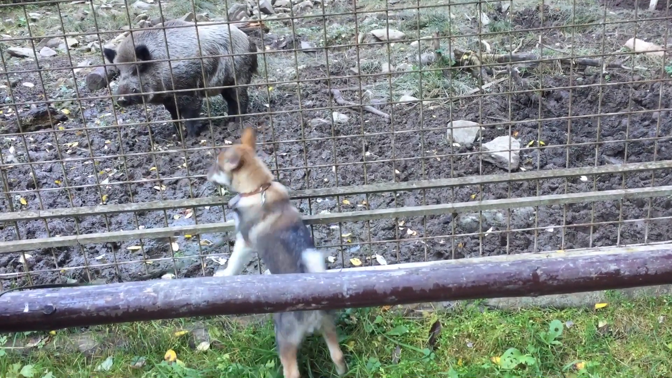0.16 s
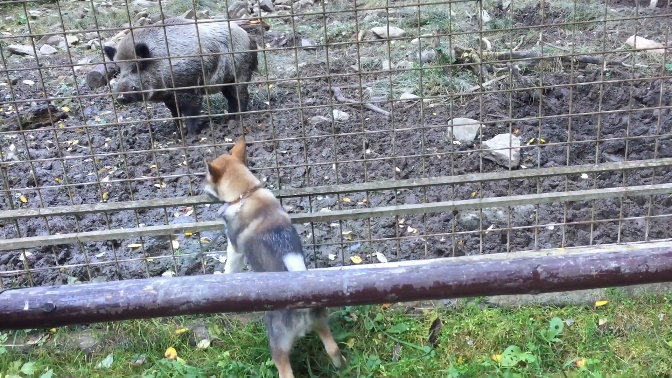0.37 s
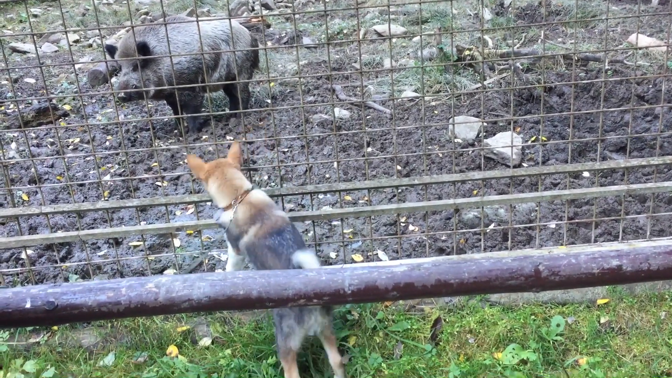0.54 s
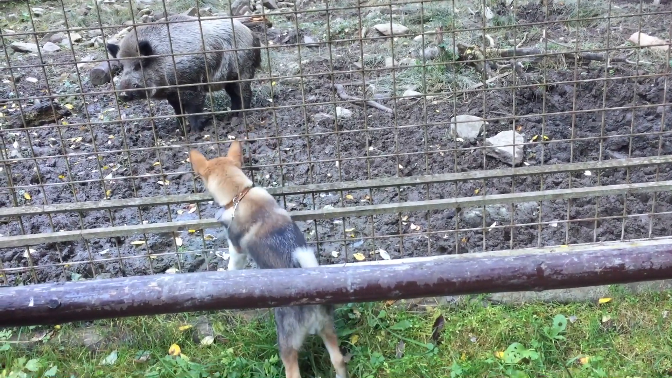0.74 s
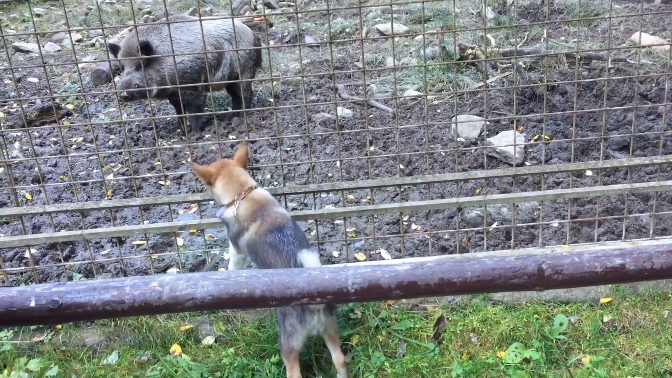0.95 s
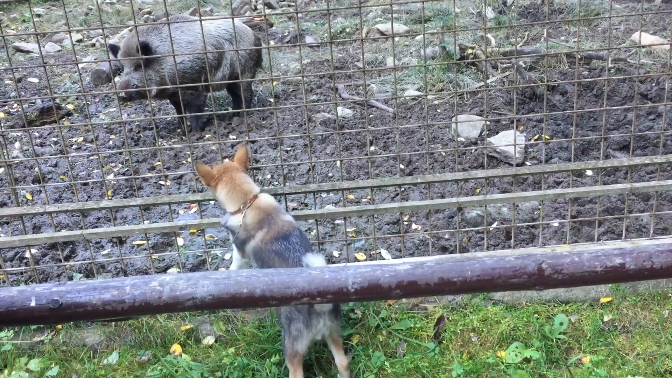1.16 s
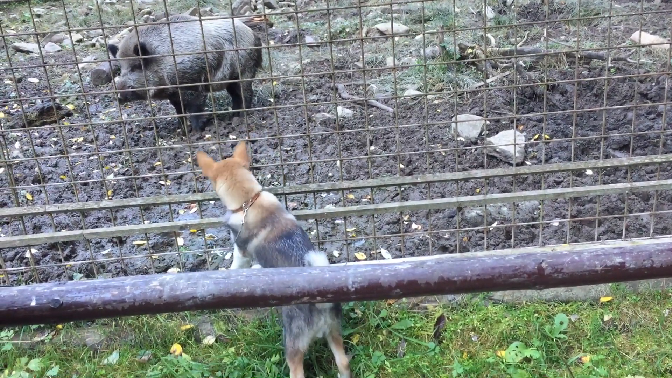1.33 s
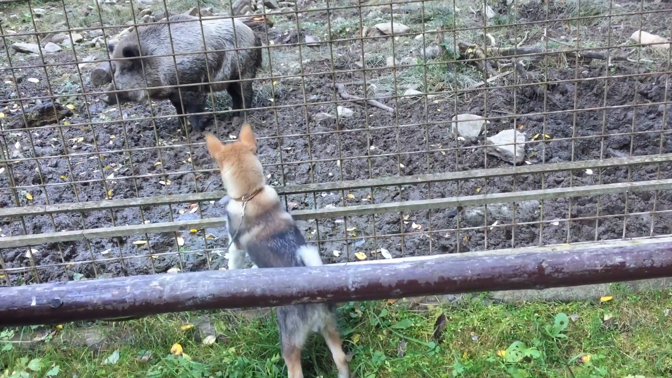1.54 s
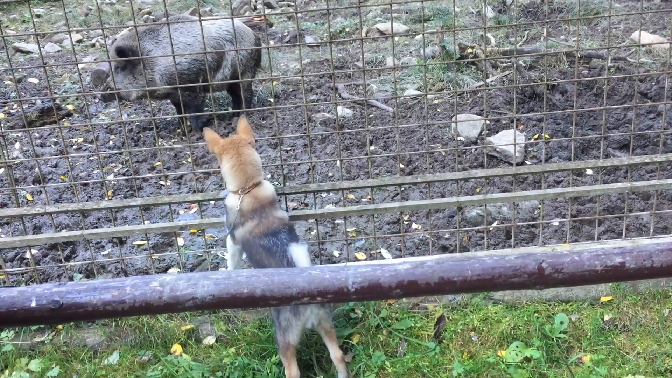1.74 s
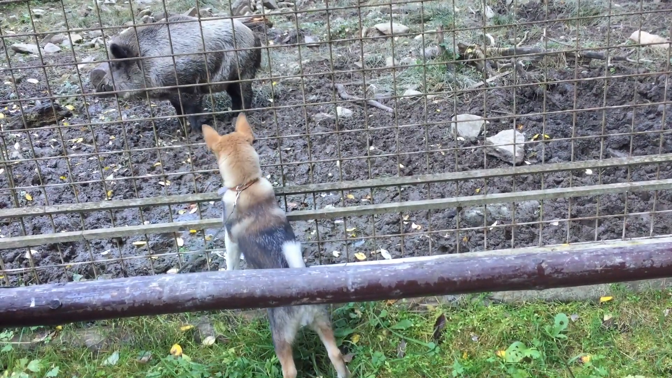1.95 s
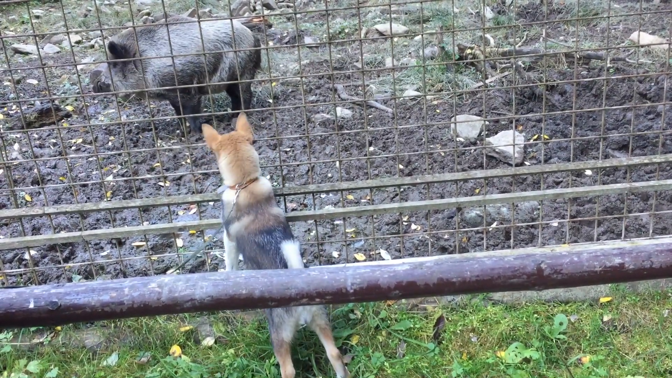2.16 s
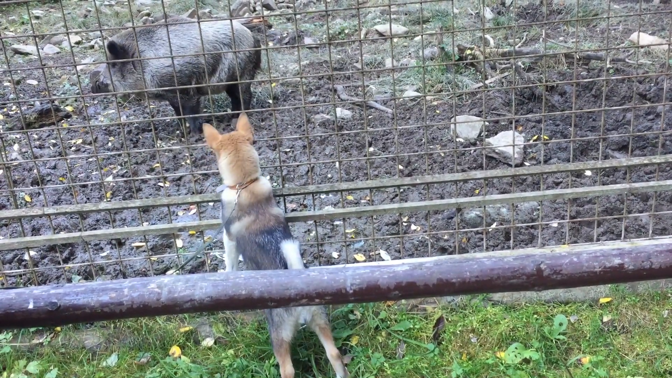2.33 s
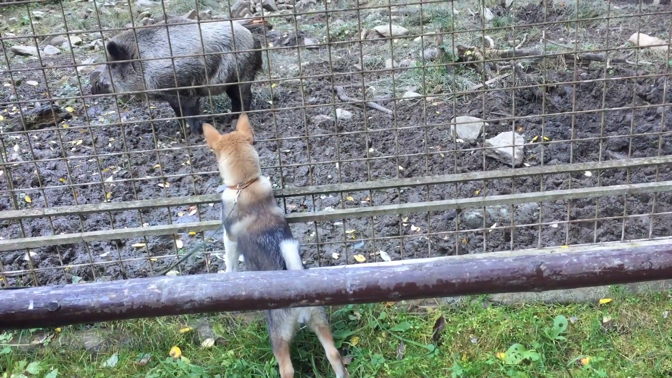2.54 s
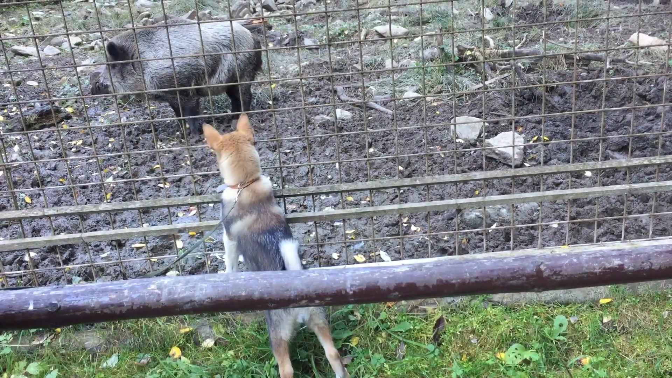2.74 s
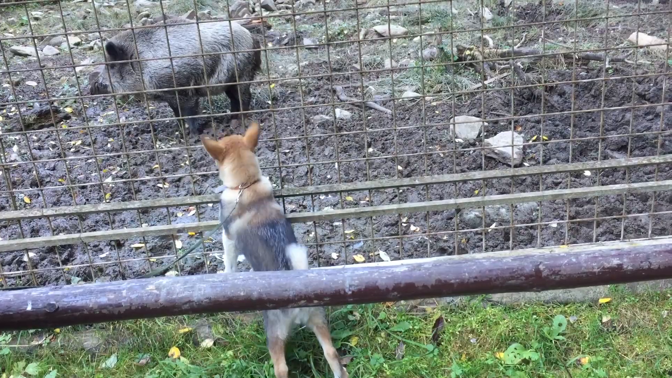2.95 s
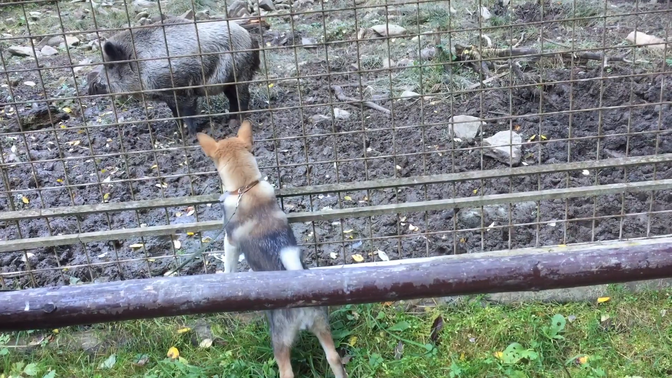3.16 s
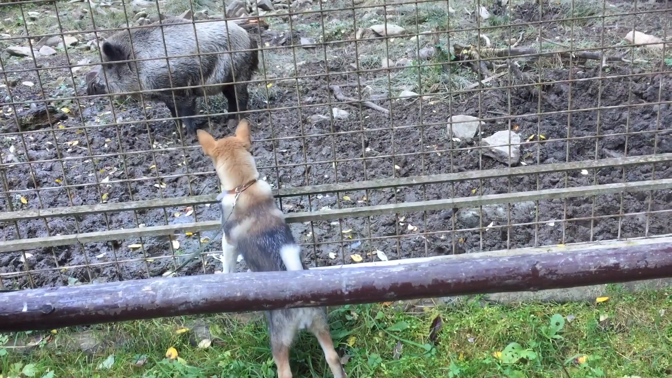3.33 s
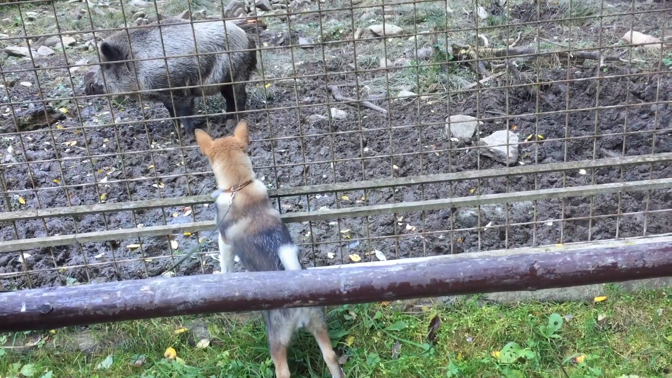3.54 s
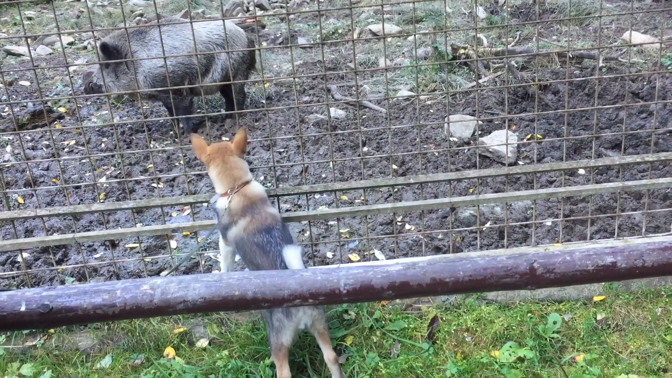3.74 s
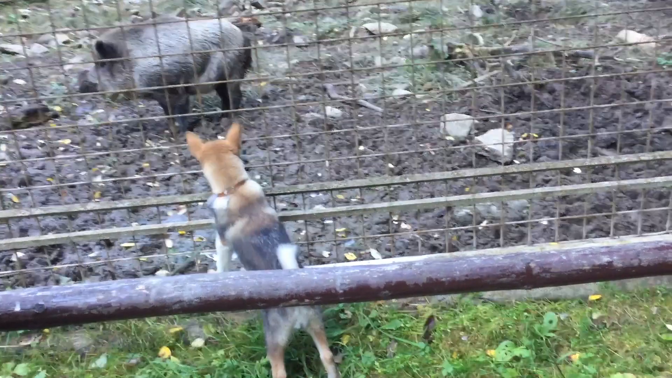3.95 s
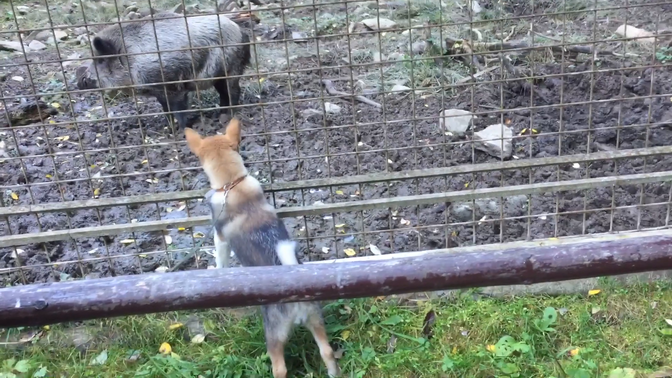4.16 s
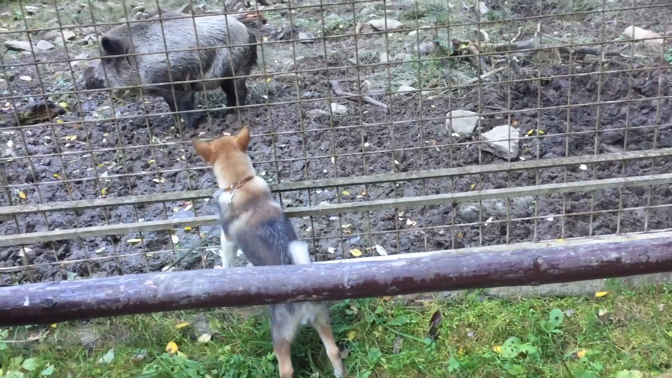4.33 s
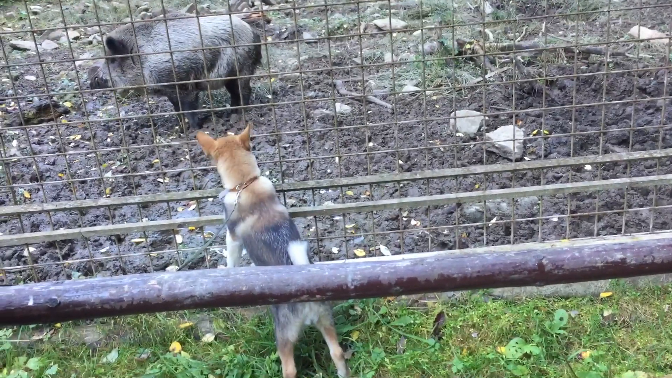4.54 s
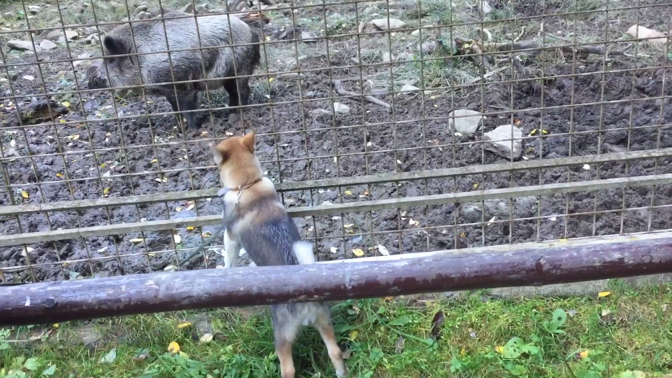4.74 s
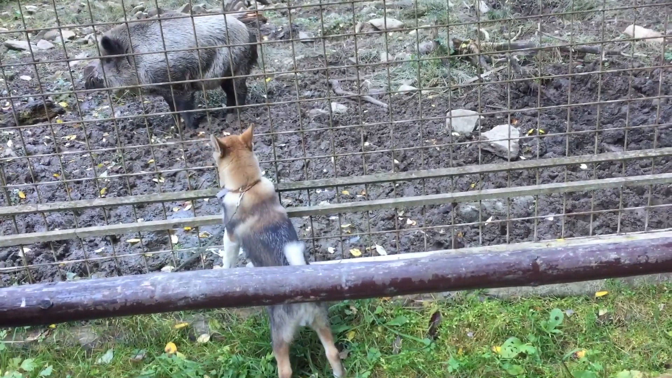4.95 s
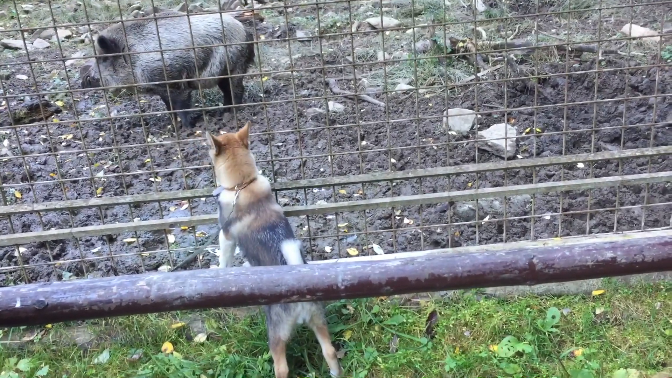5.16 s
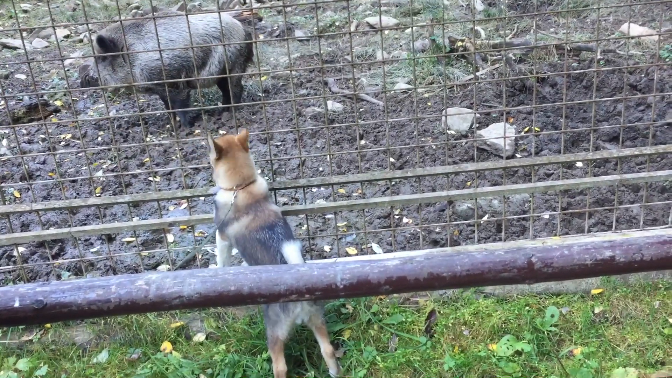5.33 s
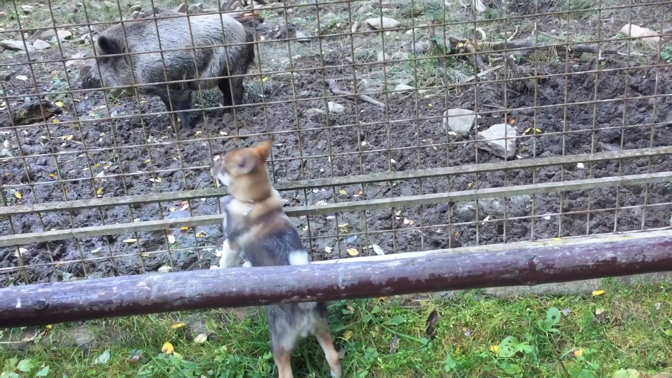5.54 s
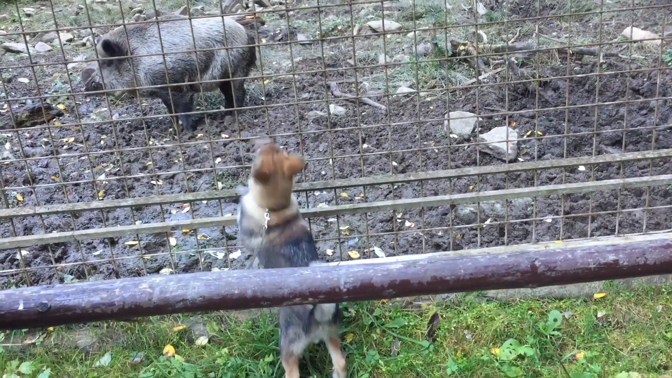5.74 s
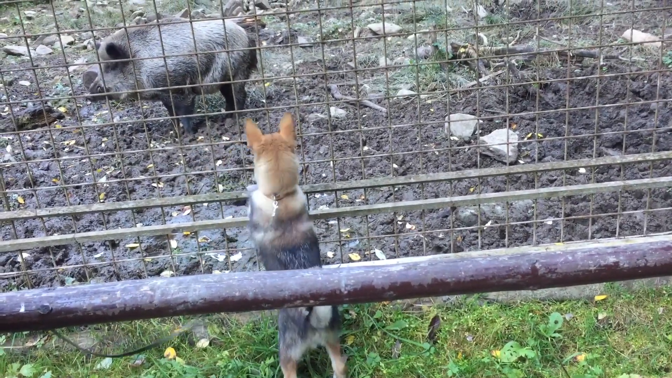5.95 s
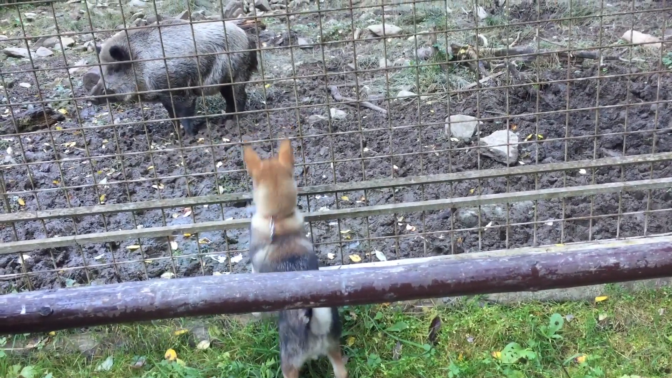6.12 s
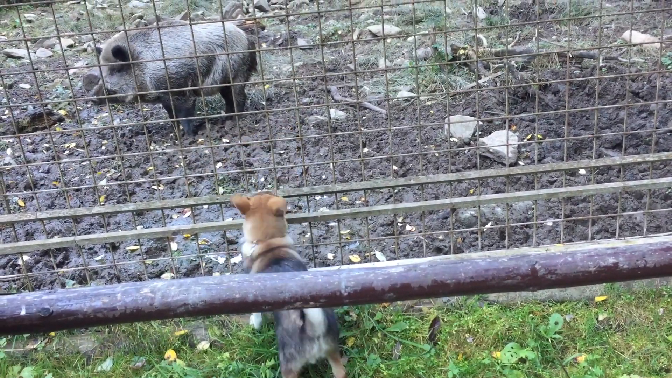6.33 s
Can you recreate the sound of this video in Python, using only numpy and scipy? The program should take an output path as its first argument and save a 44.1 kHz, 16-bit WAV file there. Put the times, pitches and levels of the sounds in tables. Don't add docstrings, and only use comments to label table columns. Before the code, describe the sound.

A young dog barks in short, piercing yaps that start as clear tones and crack into rough rasp. Two come fast, a third leads to thin, rising whines, then a pause with one small click. Five more yaps follow with whimpers and faint nasal whistles, then a pulsing yelp and a final bark. Dry, close sound in an open yard, with faint scattered echoes and very quiet air and wind.

```python
import sys
import numpy as np
from scipy import signal
from scipy.fft import rfft, irfft
from scipy.io import wavfile
from scipy.ndimage import uniform_filter1d, minimum_filter1d

SR = 44100
rng = np.random.default_rng(int(sys.argv[2]) if len(sys.argv) > 2 else 0)


def nominal_scale(level):
    x = np.asarray(level, float) / 20
    return 10 ** x


def file_out(sig):
    cols = np.atleast_2d(sig).T
    lim = np.clip(cols, -1, 1)
    pcm = np.round(lim * 32767).astype(np.int16)
    wavfile.write(sys.argv[1], SR, pcm)


N = 286191

# (start [s], length [s], peak [dB], beat rate from [Hz], beat rate to [Hz])
YAPS = [
    (0.068, 0.15, -8.5, 937.6, 689),
    (0.336, 0.17, -12, 902.6, 667),
    (.934, 0.17, -14, 867.4, 618),
    (2.982, 0.14, -8.5, 919.5, 783.6),
    (3.682, 0.12, -12, 813.4, 744),
    (4.265, 0.15, -8.5, 882.7, 600.8),
    (4.713, 0.14, -8, 845, 642.7),
    (5.421, 0.16, -9.5, 893, 848),
    (5.818, 0.058, -20.5, 956, 1046),
    (6.251, 0.14, -8, 964.4, 698),
]
# (time [s], pitch [Hz], level [dB])
LOCKED_BEATS = [
    (3.648, 278.8, -11.5),
    (3.664, 278.1, -12),
    (3.697, 280, -8.5),
]
# (frequency [Hz], density [dB per Hz])
BREATH_HISS = [(3000, -29), (3700, -11), (5500, -5.5), (6000, -1.5), (7100, 3.5), (8400, -1),
               (12600, -10.5), (15800, -11)]


def evened(x):
    return x / np.sqrt(np.mean(x ** 2) + 1e-20)


def read(points, hz):
    f, value = np.transpose(points)
    return np.interp(np.log(hz + 1), np.log(f + 1), value)


def spread(rows):
    s, *columns = np.transpose(rows)
    t = np.arange(s[0], s[-1], 1 / SR)
    return s[0], [np.interp(t, s, c) for c in columns]


def add(mix, s, sound, fade_s=0.0013):
    part = mix[round(s * SR):][:len(sound)]
    faded = sound * signal.windows.tukey(len(sound), min(1, 2 * fade_s * SR / len(sound)))
    part += faded[:len(part)]


def drift(count, hz):
    noise = rng.standard_normal(count + 2000)
    return evened(signal.lfilter(*signal.butter(2, 2 * hz / SR), noise)[2000:])


def coloured(x, points):
    gain = nominal_scale(read(points, np.fft.rfftfreq(len(x), 1 / SR)))
    return irfft(rfft(x) * gain, len(x))


def resonate(x, hz, width):
    turn = np.exp(2j * np.pi * np.cumsum(hz * np.ones(len(x))) / SR)
    r = np.exp(-np.pi * width / SR)
    return 2 * (turn * signal.lfilter([(1 - r) ** 2], [1, -2 * r, r * r], x / turn)).real


def steadied(x, span_s):
    power = uniform_filter1d(x ** 2, int(span_s * SR), mode="reflect")
    return x / np.sqrt(abs(power) + 0.081 * np.mean(x ** 2))


def glide(length, from_hz, to_hz, power=1):
    u = np.arange(0, length, 1 / SR) / length
    return u, from_hz + (to_hz - from_hz) * u ** power


def arch(u):
    return abs(np.sin(np.pi * u ** 0.79)) ** 1.01


def yard():
    # (frequency [Hz], density [dB per Hz])
    hum_colour = [(65, -55.5), (110, -18), (261, -7), (378, -6.5), (427, -14.5), (860, -4), (1500, -9),
                  (15000, -30.5)]
    level_db = -62 + 0.47 * drift(N, 8)
    return nominal_scale(level_db) * evened(coloured(rng.standard_normal(N), hum_colour))


def wind():
    # (time [s], peak [dB], length [s])
    puffs = [(0.0, -53, 0.09), (0.502, -56, 0.075), (0.684, -42, .048), (2.717, -45.5, 0.096),
             (2.811, -35.5, 0.067), (2.9, -57, 0.22), (3.455, -56, 0.093), (3.8, -58, 0.19),
             (4.107, -45, 0.086), (5.627, -44, 0.067), (5.7, -66.5, 0.39), (6.1, -53, 0.17),
             (6.285, -46, 0.21)]
    rumble_colour = [(15, -26), (45, 10.5), (80, 5.5), (130, -13.5), (300, -57)]  # (Hz, dB)
    rumble = evened(coloured(rng.standard_normal(N), rumble_colour))
    level = nominal_scale(-75 + 2.0 * drift(N, 5.9))
    for s, db, length in puffs:
        add(level, s, nominal_scale(db - 8.5) * np.hanning(int(length * SR)))
    return level * steadied(rumble, 0.31)


def echoes(x):
    # (frequency [Hz], 60 dB decay time [s])
    decay = [(300, 0.5), (800, 1.2), (2000, 2), (3200, 2.5), (6000, .25), (12000, .15)]
    noise = rng.standard_normal(int(1.5 * SR))
    hz, t, z = signal.stft(noise, SR, nperseg=256)
    near = nominal_scale(-47 - 60 * t / .085)
    shed = 1 + 1.1 * np.exp(-((t - .27) / .05) ** 2)
    far = nominal_scale(-66.0 - 60 * t / read(decay, hz)[:, None]) * shed * np.clip(t / 0.011, 0, 1)
    tail = signal.istft(z * (near + far), SR, nperseg=256)[1]
    return signal.fftconvolve(x, tail)[:N]


def ticks():
    # (time [s], peak [dB])
    clicks = [
        (0.5152, -32),
        (0.5437, -47),
        (0.5834, -48),
        (2.134, -38),
    ]
    out, t = np.zeros(N), np.arange(260) / SR
    for s, db in clicks:
        snap = np.diff(rng.standard_normal(261)) * np.exp(-t / .0013)
        add(out, s, nominal_scale(db + 4.0) * snap / abs(snap).max(), fade_s=.0002)
    return out


def gasp():
    # (frequency [Hz], density [dB])
    rasp_colour = [(100, -8), (350, 1), (2300, -3), (3800, -13), (4650, -11.5), (5500, -23), (9000, -26.5),
                   (14000, -36)]
    peak_s, rise_s, fall_s, edge_db = 3.97, 0.1, 0.18, -10
    s, (db,) = spread([(peak_s - rise_s, edge_db), (peak_s, 0), (peak_s + fall_s, edge_db)])
    rasp = evened(coloured(rng.standard_normal(len(db)), rasp_colour))
    return s, nominal_scale(-42 + db + 0.5 * drift(len(db), 20.5)) * rasp


def whistle(s, length, from_hz, to_hz, db):
    u, hz = glide(length, from_hz, to_hz)
    phase = 2 * np.pi * np.cumsum(hz * (1 + 0.0087 * drift(len(hz), 120))) / SR
    return s, np.sqrt(2) * nominal_scale(db) * arch(u) * (np.cos(phase) + nominal_scale(-20) * np.cos(2 * phase))


def moan(s, length, from_hz, to_hz, db):
    u, hz = glide(length, from_hz, to_hz)
    air = rng.standard_normal(len(hz))
    blurred = evened(resonate(air, hz, 28))
    nose = evened(resonate(air, 777, 300))
    octave = evened(resonate(air, 2 * hz, 60))
    return s, nominal_scale(db) * arch(u) * (blurred + nominal_scale(-1.5) * nose + nominal_scale(-26) * octave)


def grunt(s, db, hz, length):
    count = int(length * SR)
    return s, nominal_scale(db) * np.hanning(count) * evened(resonate(rng.standard_normal(count), hz, 110))


def tone(s, hz, size, mouth_db):
    # (frequency [Hz], level [dB])
    tract = [(1350, 0.9), (1550, 5.5), (1800, 0.9), (2130, 9), (2350, 2), (2750, -8), (3100, -11.5),
             (3400, -27)]
    # (frequency [Hz], level [dB])
    cliff = [(2400, -14), (3150, -18.5), (3500, -39), (4300, -62)]
    # (frequency [Hz], level [dB])
    upper = [(3300, -35), (5200, -40.5), (7000, -49.5), (15000, -61.5)]
    sizes = [size] + [size * nominal_scale(mouth_db + read(tract, k * hz)) for k in (2, 3)]
    effort = uniform_filter1d(np.hypot(size, sizes[1]), size=900)
    phase = 2 * np.pi * np.cumsum(hz * (1 + 0.004 * drift(len(hz), 66))) / SR
    for k in range(4, 15):
        pressed = effort ** 1.8 * nominal_scale(read(upper, k * hz) + 5.5 * drift(len(hz), 40))
        sizes.append(sizes[2] * nominal_scale(read(cliff, k * hz)) + pressed)
    sizes = [uniform_filter1d(a, size=90) * (1 + 0.021 * drift(len(hz), 250)) for a in sizes]
    air = rng.standard_normal(len(hz))
    hiss = nominal_scale(-19) * evened(coloured(air, BREATH_HISS)) / 10
    breath = sizes[0] * nominal_scale(-29.5) * evened(resonate(air, 1900, 1000) + hiss)
    partials = sum(np.sqrt(2) * a * np.cos((k + 1) * phase + k * k) for k, a in enumerate(sizes))
    return s, breath + partials


def whine(rows):
    s, (hz, size, mouth_db) = spread([(t, f, nominal_scale(db), mouth) for t, f, db, mouth in rows])
    return tone(s, uniform_filter1d(hz, size=500, mode="nearest"), size, mouth_db)


def hoot(s, length, from_hz, to_hz, db):
    u, hz = glide(length, from_hz, to_hz)
    return tone(s, hz, nominal_scale(db + 3.0 * drift(len(u), 120)) * arch(1 - u), -23.5)


def start(s, from_hz, to_hz, db, mouth_db):
    breaks = np.r_[np.array(YAPS)[:, 0], LOCKED_BEATS[0][0]]
    handover_s = .006
    u, hz = glide(breaks[breaks > s].min() - s + handover_s, from_hz, to_hz, power=.7)
    catch = 0.11
    swell = u ** (0.76 - 0.011 * db)
    opening_db = -5.5 * (1 - u)
    return tone(s, hz, nominal_scale(db) * (catch + (1 - catch) * swell), mouth_db + opening_db)


def locked():
    # (multiple of pitch [1], level [dB])
    orders = [(1, -48), (2, -14.5), (3, 0.5), (4, -4.5), (5, -10.5), (6, 3), (7, -11.5), (8, -6.5),
              (9, -12.5), (10, -12.5), (11, -19.5), (12, -20), (13, -70)]
    s, (hz, db) = spread(LOCKED_BEATS)
    phase = 2 * np.pi * np.cumsum(hz * (1 + 0.018 * drift(len(hz), 71))) / SR
    lines = sum(nominal_scale(o + 2.1 * drift(len(hz), 90)) * np.cos(k * phase + k * k) for k, o in orders)
    air = evened(coloured(rng.standard_normal(len(hz)), BREATH_HISS))
    return s, nominal_scale(db) * (evened(lines) + nominal_scale(-35.5) * air)


def yap(s, length, db, from_hz, to_hz, second_hz, mouth, uneven, open_db, air_db, rise_s, extra, sagged):
    # (level [dB], short at the break [dB], held share [1], fade [dB], share of mouth level [1])
    layers = [(0.17, -10, 0.31, -37, 0.1345), (1.7, -6.5, 0.35, -33.5, 1.45), (-3.5, -2, 0.49, -31.5, 2),
              (0.4, -16.5, 0.39, -22, 0.07)]
    # (frequency [Hz], width [Hz], level [dB])
    mouth_modes = [(2110, 160, 3.5), (2325, 150, 0.5), (2636, 130, 1.5), (3123, 33, -14.5)]
    # (frequency [Hz], width [Hz], level [dB])
    clumps = [(4350, 1200, -1.3), (6340, 1200, 0), (7920, 5400, 0.5), (9840, 4200, -2), (13200, 6200, -2.5)]
    u = glide(length, 0, 0)[0]
    hz = from_hz + (to_hz - from_hz) * np.minimum(u / sagged, 1)
    levels = []
    for own, short, held, fade, share in layers:
        hold = held + extra
        faded = np.clip((u - hold) / (1 - hold), 0, 1) ** 1.21
        levels.append(db + own + share * open_db + short * np.exp(-u * length / rise_s) + fade * faded)
    low_db, second_db, mouth_db, hiss_db = levels

    turns = np.cumsum(hz * (1 + .05 * drift(len(hz), 160))) / SR
    beat = np.diff(np.floor(turns), prepend=0)
    strength = np.clip(rng.standard_normal(300), -1.8, 1.8)[turns.astype(int)]
    low = steadied(resonate(beat * (1 + uneven * strength), hz, 310), 0.013)
    ragged = evened(beat * (.9 + strength)) + .35 * rng.standard_normal(len(hz))
    jaw = (1 + 0.027 * drift(len(hz), 23)) * (hz / hz.mean()) ** 0.29

    def ring(modes):
        return evened(sum(nominal_scale(g) * steadied(resonate(ragged, f * jaw, w), .012) for f, w, g in modes))

    second = ring([(.9 * second_hz, 200, -3.0), (1.033 * second_hz, 170, 0.)])
    upper_mouth = ring([(f * mouth, w, g) for f, w, g in mouth_modes])
    puff = (1.2 + abs(strength) * np.exp(-(turns % 1) / 0.32)) * rng.standard_normal(len(hz))
    air = coloured(puff, BREATH_HISS)
    hiss = sum(nominal_scale(g + 2.6 * drift(len(hz), 30)) * resonate(air, f * jaw, w) for f, w, g in clumps)
    voice = nominal_scale(low_db) * low + nominal_scale(second_db) * second + nominal_scale(mouth_db) * upper_mouth
    voice = signal.lfilter(*signal.butter(4, 2 * 500 / SR, "high"), voice)
    return s, voice + nominal_scale(air_db + hiss_db) * (1 - u ** 4) * evened(hiss)


def small_calls(pup):
    # (start [s], length [s], from [Hz], to [Hz], peak [dB])
    moans = [
        (3.25, .24, 480, 450, -45),
        (3.46, .17, 475, 505, -52),
        (4.15, .11, 440, 415, -49),
        (4.125, .09, 800, 870, -48),
        (4.45, .14, 430, 360, -50),
    ]
    # (start [s], length [s], from [Hz], to [Hz], peak [dB])
    whistles = [(1.43, .15, 5040, 5130, -71), (1.45, .15, 3300, 3500, -66), (1.56, .085, 4850, 4600, -55),
                (1.632, .03, 4600, 4050, -60), (1.605, .035, 5600, 5500, -64),
                (3.34, .055, 4400, 4750, -58), (3.585, .045, 4620, 4620, -55),
                (3.795, .04, 5300, 4350, -64), (4.14, .07, 1260, 1220, -56), (4.408, .028, 5300, 4650, -56),
                (4.43, .095, 4760, 4800, -52), (4.5, .18, 4720, 4650, -67), (4.52, .14, 5520, 5480, -70),
                (4.5, .15, 3830, 3800, -70), (5.665, .04, 5350, 5450, -62)]
    # (time [s], peak [dB], pitch [Hz], length [s])
    grunts = [
        (0.162, -40.5, 415, 0.062),
        (1.048, -47, 423, 0.048),
        (3.126, -60, 262.8, 0.028),
        (4.362, -36, 477, 0.033),
        (5.833, -50.5, 383, 0.053),
        (6.334, -47, 304, 0.084),
    ]
    for voice, table in [(moan, moans), (whistle, whistles), (grunt, grunts)]:
        for row in table:
            add(pup, *voice(*row), fade_s=.003)
    add(pup, *gasp(), fade_s=0.06)


def whining(pup):
    # (time [s], pitch [Hz], level [dB], mouth [dB])
    murmur = [(.487, 471, -53, 2), (0.511, 461.4, -43, -6.5), (0.591, 428.3, -39.5, -12.5),
              (0.642, 448, -39, -3.5), (.72, 491, -51.5, -8.5)]
    # (time [s], pitch [Hz], level [dB], mouth [dB])
    sob = [(1.13, 547, -51, 1.5), (1.201, 590, -59.5, 3.5), (1.231, 676, -29, -12),
           (1.246, 727, -21.5, -10.5), (1.26, 766, -23.5, -17), (1.321, 771, -38.5, -13),
           (1.343, 701, -33.5, -8), (1.366, 745, -26, -30), (1.391, 818, -53, -20)]
    # (time [s], pitch [Hz], level [dB], mouth [dB])
    plea = [(1.388, 806, -47, -17), (1.402, 803, -34.5, -16), (1.45, 858, -34.5, -23.5),
            (1.49, 833, -30.5, -29.5), (1.562, 876, -29.5, -37.5), (1.62, 886, -32, -21),
            (1.653, 869, -59, -23)]
    # (time [s], pitch [Hz], level [dB], mouth [dB])
    whimper = [(4.375, 728, -28.5, -16), (4.4, 741, -22.5, -29.5), (4.454, 730, -33, -29.5),
               (4.467, 840, -42.5, -20.5), (4.54, 848, -39.5, -31.5), (4.622, 817, -33, -36),
               (4.66, 779, -27.5, -29), (4.674, 837, -27.5, -23.5), (4.686, 1070, -24.5, -14.5)]
    # (time [s], pitch [Hz], level [dB], mouth [dB])
    lead_in = [(5.6, 768, -48, -8), (5.65, 775, -40, -17), (5.675, 764, -33.5, -22),
               (5.689, 793, -20.5, -20), (5.701, 792, -33.5, 6)]
    # (time [s], pitch [Hz], level [dB], mouth [dB])
    yelp = [(5.696, 755, -35, -6), (5.706, 883, -11.5, -12.5), (5.731, 950, -7, -19.5),
            (5.749, 979, -35, 4.5), (5.759, 1025, -11.5, -14), (5.785, 1042, -6.5, -34.5),
            (5.805, 1006, -11.5, -21), (5.821, 974, -18.5, -11), (5.835, 910, -28, -14)]
    for rows in murmur, sob, plea, whimper, lead_in, yelp:
        add(pup, *whine(rows), fade_s=.003)


def yapping(pup):
    # (second resonance [Hz], factor on the upper mouth resonances [1], beat unevenness [1],
    # mouth [dB], hiss [dB])
    throats = [(1515, 1.01, 0.6, -3.5, -24.5), (1427, .92, 2, -2.5, -25), (1487, .92, .87, -1.5, -26),
               (1410, .99, 0.57, -7, -36.5), (1553, .93, 0.52, -3, -33), (1538, .98, 0.84, -4, -33.5),
               (1578, .98, 0.81, -4.5, -35), (1414, .98, 0.66, -5.5, -34), (1480, 0.17, 0.87, -7, -39.5),
               (1470, 1.01, 0.83, -5, -34.5)]
    # (rise [s], extra held share [1], share by which the rate has sagged [1])
    paces = [(0.0038, 0.095, .8), (.022, 0.11, 0.98), (0.0047, 0.017, .48), (0.0066, .01, .55),
             (0.0027, 0.011, .6), (0.012, .01, .8), (0.016, 0.043, .85), (0.0039, 0.061, 0.26),
             (0.011, 0.16, 0.64), (0.0046, .01, .85)]
    # (start [s], from [Hz], to [Hz], final level [dB], mouth [dB])
    starts = [(.04, 984, 938, -2, -27), (.297, 611, 837, -18.5, -9), (.911, 903, 882, -4, -16.5),
              (2.961, 1193, 899, -6.5, -24.5), (3.622, 1083, 1131, -15.5, -3.5),
              (4.242, 910, 1115, -15, -4.5), (4.684, 1065, 1094, -20.5, 3.5), (5.394, 874, 929, -2, -16),
              (6.208, 865, 1005, -4, -16.5)]
    # (start [s], length [s], from [Hz], to [Hz], peak [dB])
    hoots = [
        (1.013, .08, 635.4, 1043, -23),
        (3.057, 0.041, 842, 855, -13.5),
        (3.739, .055, 931, 746, -20),
        (5.5, 0.034, 864, 867, -18),
    ]
    for row, throat, pace in zip(YAPS, throats, paces):
        add(pup, *yap(*row, *throat, *pace), fade_s=.005)
    for voice, table in [(start, starts), (hoot, hoots)]:
        for row in table:
            add(pup, *voice(*row), fade_s=.003)
    add(pup, *locked(), fade_s=0.007)


def scene():
    pup = ticks()
    small_calls(pup)
    whining(pup)
    yapping(pup)
    return (pup + echoes(pup) + yard() + wind())[None]


def top_cut(x):
    return signal.sosfilt(signal.butter(12, 16280, fs=SR, output="sos"), x)


def record(dry):
    thud = signal.lfilter(*signal.butter(2, [2 * 25 / SR, 2 * 300 / SR], "band"), dry ** 2)
    bent = dry + nominal_scale(-25.5) * thud
    ceiling = .97
    room = minimum_filter1d(np.minimum(1, ceiling / (abs(bent) + 1e-9)), size=120)
    held = bent * uniform_filter1d(room, size=100)
    edge = signal.firwin(301, 16150, window=("kaiser", 8), fs=SR)
    mix = signal.oaconvolve(held, edge[None], "same")
    return top_cut(mix)


dry = scene()
out = record(dry)
file_out(out)
```